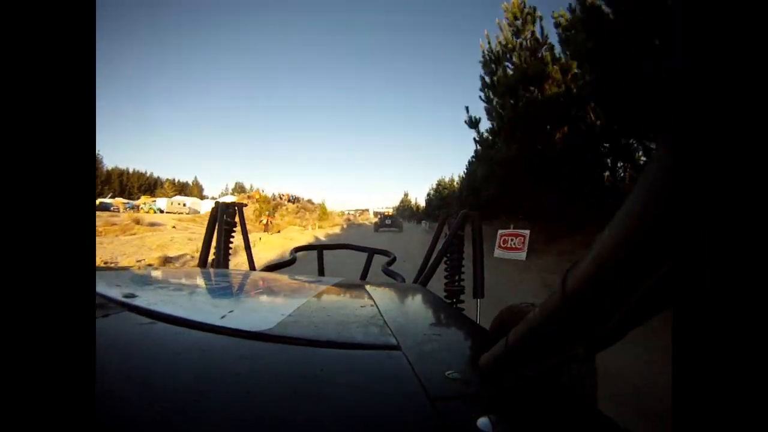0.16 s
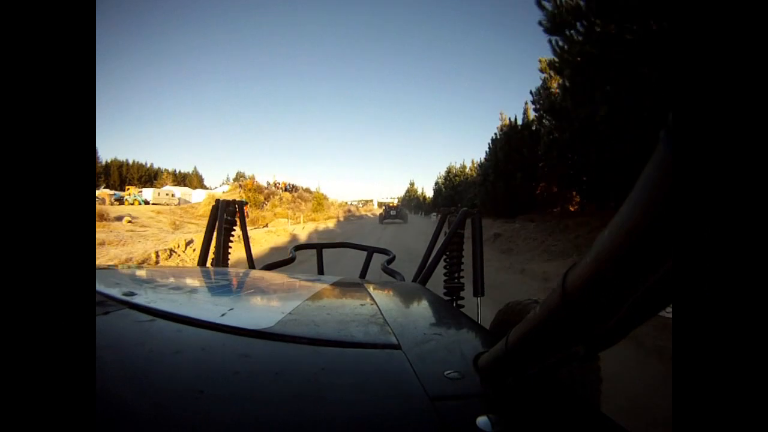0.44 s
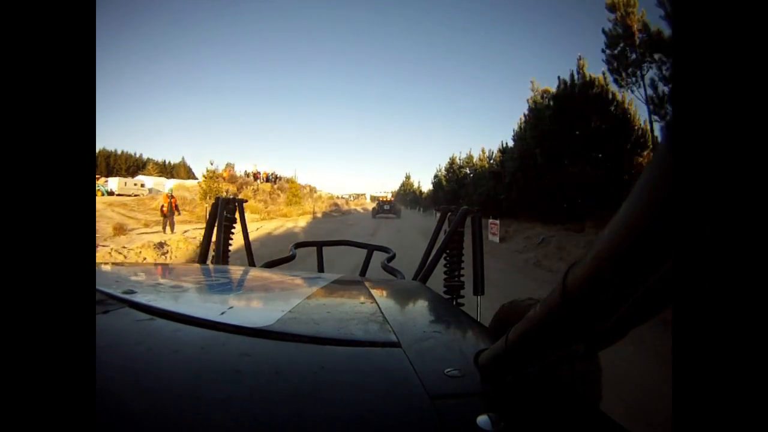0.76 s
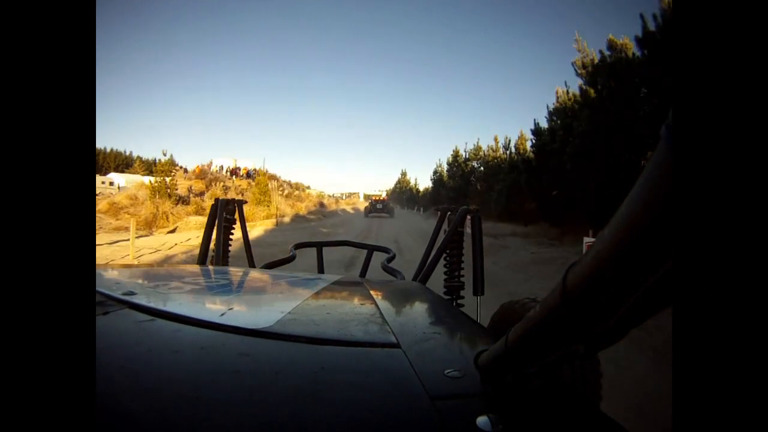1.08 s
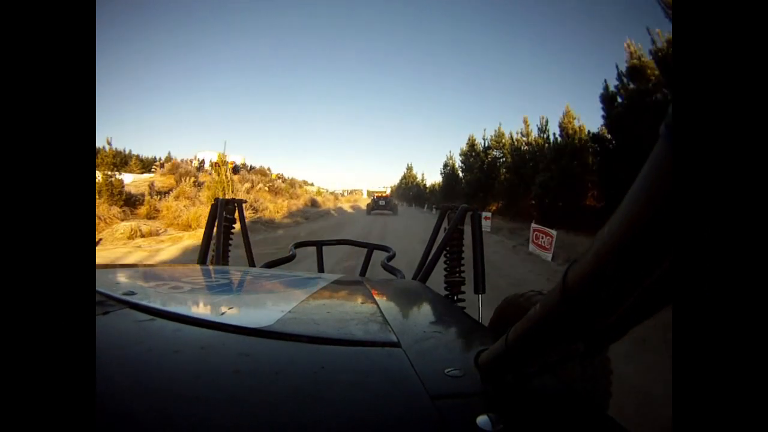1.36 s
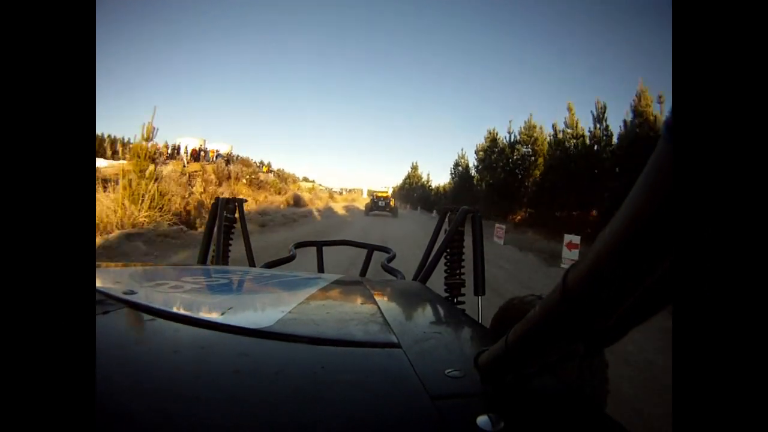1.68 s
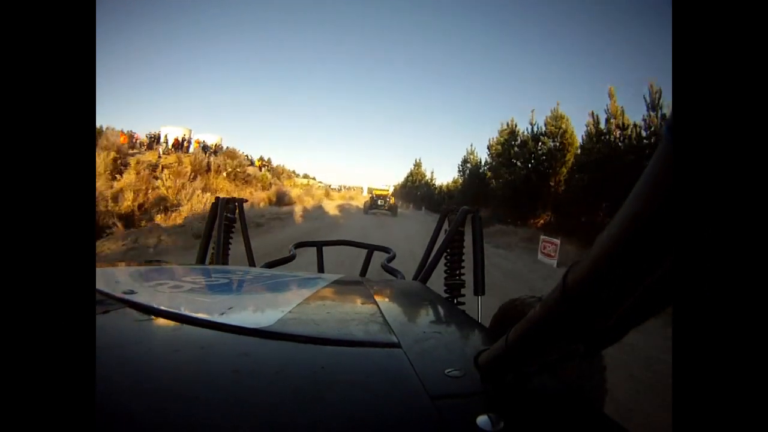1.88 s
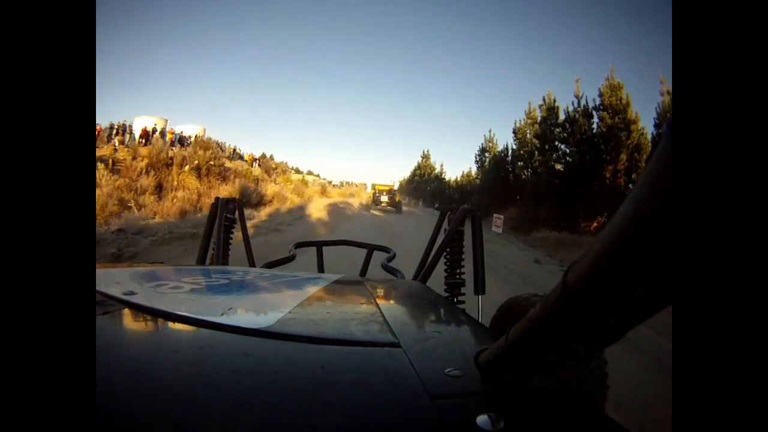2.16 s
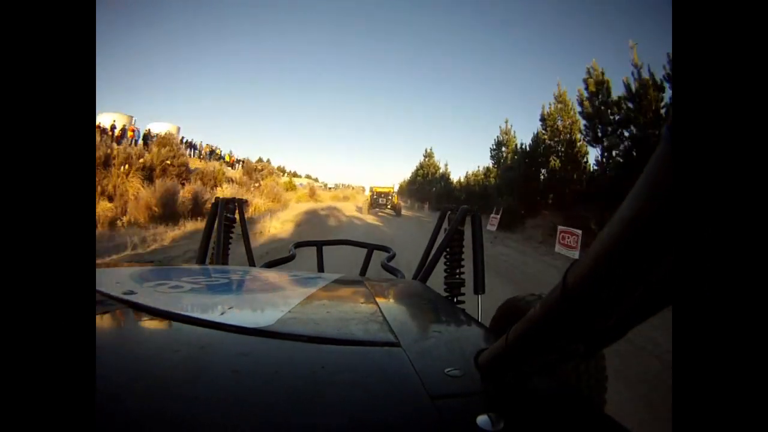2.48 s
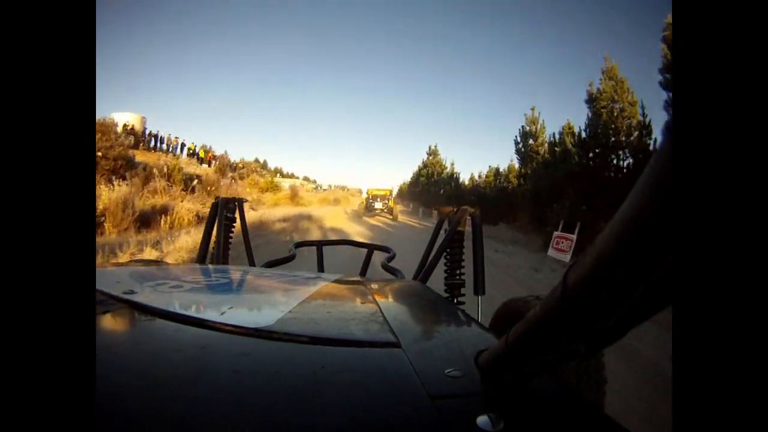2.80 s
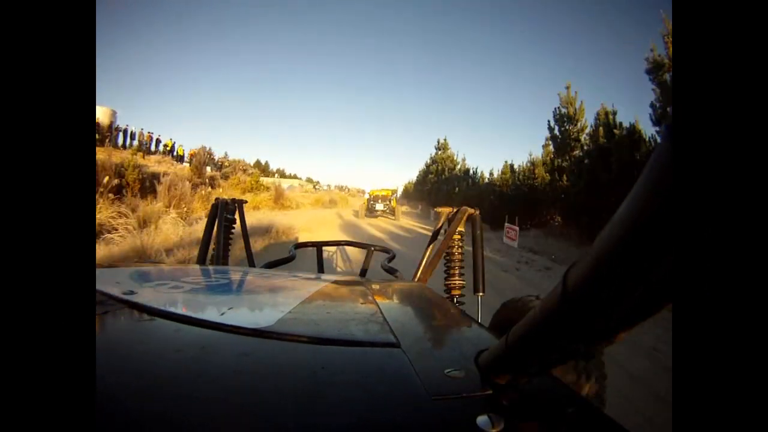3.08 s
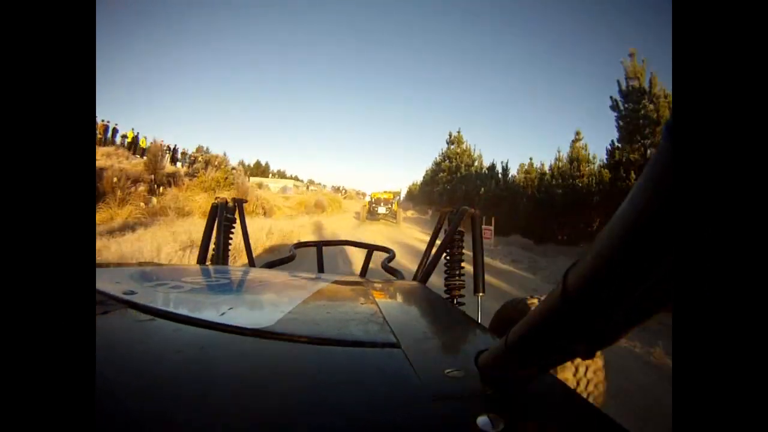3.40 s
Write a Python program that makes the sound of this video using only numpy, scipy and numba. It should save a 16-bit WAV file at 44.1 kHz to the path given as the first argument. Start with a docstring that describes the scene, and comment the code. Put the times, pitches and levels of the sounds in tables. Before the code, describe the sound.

An off-road race car's engine and drivetrain roar, close and overloaded, through a camera microphone fixed to the vehicle. Booming pitch climbs until about 0.6 s with exhaust bark, then drops to a lower drone by 1.5 s. Gear whine flutters through the middle; loose parts buzz and rattle throughout. Hard knocks hit near 0.3, 0.6, 2.5 and 2.9 s. Throttle barks again from 3 s, over rough road and wind noise, with gritty, metallic treble.

```python
"""Off-road race car cabin on dirt

A small camera in a plastic housing is bolted to the cage. Shaft orders boom through cabin resonances,
gear-mesh harmonics whine, the exhaust barks on throttle. Loose parts rattle and knock the housing modes;
shaped noise roars behind. The camera limits and clips, samples at 12 kHz and holds each sample,
which mirrors the sound into the treble."""
import sys
import numpy as np
from scipy import signal
from scipy.fft import rfft, irfft
from scipy.io import wavfile
from scipy.ndimage import uniform_filter1d
from numba import njit

SR = 44100
rng = np.random.default_rng(int(sys.argv[2]) if len(sys.argv) > 2 else 0)


def amplitude_ratio(level_db):
    """Convert a level in decibels to the matching linear amplitude (field) ratio."""
    exponent = np.asarray(level_db, float) / 20
    return 10 ** exponent


def generate_wav(sig):
    """Save sig (samples, or channels by samples) to the path in sys.argv[1] as 16-bit PCM at SR."""
    pcm = np.round(np.clip(np.atleast_2d(sig).T, -1, 1) * 32767).astype(np.int16)
    wavfile.write(sys.argv[1], SR, pcm)


N = 156114
T = np.arange(N) / SR

# shaking of the car, levels before each source's trim: time_s, rattle_db, cabin_boom_db, floor_thrum_db
SHAKING = [(0, -14.5, -10, -33), (.2, -13.5, -12, -32), (.49, -11.5, -13, -28), (.57, -18.5, -18, -48),
           (.68, -13, -15, -41), (.74, -23.5, -15.5, -39), (.96, -13, -17, -25.5), (1.02, -24, -24, -27),
           (1.12, -15, -10, -24), (1.4, -14, -14, -28), (1.6, -17.5, -20, -17), (2.15, -16, -20, -22),
           (2.4, -12, -22.5, -16.5), (2.58, -15, -21.5, -26.5), (3.15, -17.5, -19, -20.5),
           (3.54, -14.5, -11.5, -34)]
# spans of open throttle: start_s, end_s, firing_start_hz, firing_end_hz, level_db
THROTTLE = [(-.05, 0.22, 158.7, 192, -38.5), (0.301, 0.512, 208, 226, -41),
            (3.035, 3.208, 249.5, 283, -35.5), (3.2, 3.591, 201.5, 258, -35)]
# housing and bracket modes: mode_hz, relative_level_db
HOUSING_MODES = [(1230, -2), (1460, 2.5), (1900, 1.5), (2150, -0.5), (2400, -0.5), (2850, -13.5),
                 (3350, -8.5), (3800, -20)]


def curve(table, axis):
    """One column of a table, interpolated over time."""
    table = np.array(table, float)
    return np.interp(T, table[:, 0], table[:, axis])


def unit(x):
    """Scale to rms 1."""
    return x / np.sqrt(np.mean(x ** 2))


def walk(rate_hz):
    """Random levels, each held 1 / rate_hz, slewed twice; rms 1."""
    hold = int(SR / rate_hz)
    steps = np.repeat(rng.standard_normal(N // hold + 1), hold)
    slewed = uniform_filter1d(uniform_filter1d(steps, hold), hold)
    return unit(slewed[:N])


def gate(start_s, end_s):
    """Linear 19 ms fades in and out inside a span."""
    return np.clip(np.minimum(T - start_s, end_s - T) / 0.019, 0, 1)


def ring(x, hz, t60_s):
    """One decaying mode: complex one-pole resonator."""
    pole = np.exp(2j * np.pi * hz / SR - np.log(1000) / (max(t60_s, .002) * SR))
    return signal.lfilter([1], [1, -pole], x).imag


def tone(hz):
    """Sine of rms 1 on a moving pitch, random start phase."""
    return np.sqrt(2) * np.sin(2 * np.pi * (np.cumsum(hz) / SR + rng.random()))


def stiff(x):
    """Stiff bracket: band-pass over the span of its modes."""
    low_hz, high_hz = 1226, 3980
    return signal.sosfilt(signal.butter(6, [low_hz, high_hz], "band", fs=SR, output="sos"), x)


def boom(shaft_hz):
    """Shaft orders, loud where they cross a cabin resonance; the floor pan thrums below."""
    # shaft_multiple, level_db
    orders = [(1., 2.5), (1.5, -7.5), (2., -2.5), (3., -7.5), (4., -12.5), (5., -7.5)]
    # cabin resonances: centre_hz, width_hz, level_db
    resonances = [(117.3, 41.5, -5), (172.7, 24.7, -3.5), (252.7, 44.5, -8)]
    thrum_hz, thrum_width_hz = 38.2, 6.2
    cabin = 0
    for multiple, db in orders:
        hz = multiple * shaft_hz * (1 + 0.0044 * walk(8.8))
        gain = sum(amplitude_ratio(peak_db) / (1 + (2 * (hz - centre_hz) / width_hz) ** 2)
                   for centre_hz, width_hz, peak_db in resonances)
        cabin = cabin + amplitude_ratio(db + 3.26 * walk(11)) * gain * tone(hz)
    pan = unit(ring(rng.standard_normal(N), thrum_hz, 3.5 / thrum_width_hz))
    cabin_gain = amplitude_ratio(curve(SHAKING, axis=2) - 2.5)
    pan_gain = amplitude_ratio(curve(SHAKING, axis=3) + 0.5)
    return cabin_gain * cabin + pan_gain * pan


def gears(shaft_hz):
    """Harmonics of the gear mesh whine while it is loaded, with fluttering level and pitch."""
    # mesh_harmonic, start_s, end_s, level_db
    whines = [(2, -.1, .08, -17), (2, .88, 1.18, -24), (2, 1.42, 1.53, -23), (2, 2.25, 3., -26.5),
              (3, .74, 1.2, -34), (3, 2.15, 2.52, -25), (3, 2.6, 3.2, -24), (4, 1.14, 1.33, -33),
              (5, 2.5, 3.05, -36)]
    mesh_per_turn, flutter_db = 11.5, 4
    out = 0
    for harmonic, start_s, end_s, db in whines:
        hz = harmonic * mesh_per_turn * shaft_hz * (1 + 0.004014 * walk(41.2))
        gain = amplitude_ratio(db + flutter_db * walk(30))
        out = out + gate(start_s, end_s) * gain * tone(hz)
    return out


def exhaust():
    """Harmonics of a rising firing rate bark while the throttle is open."""
    # firing_multiple, relative_level_db
    bark = [(1, 5.5), (2, -3.5), (3, -5), (4, -9.5)]
    out = 0
    for start_s, end_s, start_hz, end_hz, db in THROTTLE:
        firing_hz = np.interp(T, [start_s, end_s], [start_hz, end_hz]) * (1 + 0.007 * walk(34.9))
        harmonics = sum(amplitude_ratio(db + rel_db + 2.75 * walk(40)) * tone(multiple * firing_hz)
                        for multiple, rel_db in bark)
        out = out + gate(start_s, end_s) * harmonics
    return out


def rattle():
    """Bunched taps of loose parts and a steady buzz ring the housing, each tap in its own colour."""
    taps_per_s, tail_db, bunch_db, max_tap_db, buzz_db = 120, 4.5, 3, 7, -8
    ring_cycles = 33.4  # to -60 dB
    count = int(taps_per_s * N / SR)
    at = rng.integers(0, N, count)
    tap_db = tail_db * rng.exponential(size=count) + bunch_db * walk(27.57)[at]
    size = amplitude_ratio(np.minimum(tap_db, max_tap_db))
    out = 0
    for hz, db in HOUSING_MODES:
        taps = np.bincount(at, size * rng.standard_normal(count), N)
        drive = unit(taps) + amplitude_ratio(buzz_db) * rng.standard_normal(N)
        out = out + amplitude_ratio(db) * unit(ring(drive, hz, ring_cycles / hz))
    return amplitude_ratio(curve(SHAKING, axis=1) - 3.5) * unit(stiff(out))


def knocks():
    """Each blow chatters for a moment and rings most the modes near its own pitch."""
    # hard blows: time_s, level_db, centre_hz
    blows = [(0.2186, -0.5, 1460), (0.2788, 8, 1296), (0.5882, 7.5, 1350), (0.625, -2, 1400),
             (0.6548, -1.5, 2250), (0.713, -5, 1300), (0.8984, -5, 1480), (0.985, -1.5, 1500),
             (1.2233, -2.5, 2320), (1.4568, -9, 1460), (1.515, -1, 1830), (1.6686, 1, 1500),
             (1.707, -3.5, 2400), (1.7836, -1, 1840), (1.852, -8.5, 1450), (1.8713, -0.5, 1450),
             (1.917, -5.5, 1330), (1.9574, -3, 2460), (1.9826, -3.5, 2430), (2.0538, 1, 2320),
             (2.0813, -3.5, 1510), (2.0952, -3, 1460), (2.1132, -13, 1550), (2.171, -3, 1360),
             (2.3074, 2.5, 2030), (2.473, 3, 1540), (2.5253, 7, 1570), (2.6205, 1.5, 2390),
             (2.8838, 10.5, 2340), (2.9692, 0, 1460), (3.2268, 4.5, 2380), (3.271, 2, 1480)]
    contact_s, reach_oct = 0.001405, 0.17
    ring_cycles = 17.8  # to -60 dB
    contact_n = int(contact_s * SR)
    time_s, level_db, centre_hz = np.array(blows).T
    starts = (time_s * SR).astype(int)
    out = 0
    for hz, mode_db in HOUSING_MODES:
        drive = np.zeros(N + contact_n)
        nearness = np.exp(-(np.log2(hz / centre_hz) / reach_oct) ** 2) + 0.48  # floor: every mode rings
        share = amplitude_ratio(level_db + 0.37 * mode_db) * nearness
        chatter = np.cos(2 * np.pi * hz * np.arange(contact_n) / SR) * 2.55 / contact_n
        for start, gain in zip(starts, share):
            drive[start:start + contact_n] += gain * chatter
        out = out + ring(drive[:N], hz, ring_cycles / hz)
    return stiff(out)


def road():
    """Flickering noise roar of engine, tyres and wind; it swells with the shaking and the throttle."""
    # roar through the housing: freq_hz, relative_density_db
    spectrum = [(22, -20), (130, 2), (332, -16), (650, -18), (900, -24.5), (1260, -4), (3370, -20.5),
                (5900, -30)]
    base_db, throttle_db = -15, 3.5
    follow = 0.41  # dB per dB of rattle
    bin_hz = np.maximum(np.arange(N // 2 + 1) * SR / N, 1)
    freq_hz, density_db = np.array(spectrum).T
    shape = amplitude_ratio(np.interp(np.log(bin_hz), np.log(freq_hz), density_db))
    noise = irfft(rfft(rng.standard_normal(N)) * shape, N)
    open_db = throttle_db * sum(gate(start_s, end_s) for start_s, end_s, *_ in THROTTLE)
    shake_db = follow * curve(SHAKING, axis=1)
    return amplitude_ratio(base_db + open_db + shake_db + 2.67 * walk(70)) * unit(noise)


def scene():
    """Everything that shakes the camera."""
    # time_s, shaft_hz
    shaft_points = [(0, 82.6), (.17, 91.07), (.33, 108.7), (.61, 120.7), (.74, 99.1), (.9, 88.5),
                    (1.07, 80.8), (1.24, 70.5), (1.44, 64.1), (1.51, 57.85), (1.7, 59.7), (2.2, 58.43),
                    (2.88, 55.25), (3.04, 58.45), (3.54, 55.5)]
    shaft_hz = curve(shaft_points, axis=1)
    return (boom(shaft_hz) + gears(shaft_hz) + exhaust() + rattle() + knocks() + road())[None]


@njit
def limiter(x, top, attack, release):
    """Turns the gain down while the envelope is over top; attack, release are per-sample rates."""
    y, envelope = np.empty(len(x)), 0.
    for i in range(len(x)):
        level = abs(x[i])
        envelope += (level - envelope) * (attack if level > envelope else release)
        y[i] = x[i] * min(1., top / (envelope + 1e-9))
    return y


def low_pass(x):
    """Removes everything above the highest recorded frequency."""
    return signal.sosfilt(signal.butter(12, 15700, fs=SR, output="sos"), x)


def record(dry):
    """Limiter, clipping at 12 kHz sampling, each sample held four times at 48 kHz, top cut."""
    limit_db, attack_s, release_s, drive_db = -7.5, 0.0011, 0.028, 1.5
    limited = limiter(dry[0], amplitude_ratio(limit_db), 1 / (attack_s * SR), 1 / (release_s * SR))
    driven = limited * amplitude_ratio(drive_db)
    slow = np.clip(signal.resample_poly(driven, 40, 147), -1, 1)  # 12 kHz
    held = signal.resample_poly(np.repeat(slow, 4), 147, 160)[:N]  # 48 kHz hold, back to SR
    cut = signal.sosfiltfilt(signal.ellip(6, .2, 10, 15300, fs=SR, output="sos"), held)
    return low_pass(np.clip(cut, -1, 1)[None])


dry = scene()
out = record(dry)
generate_wav(out)
```